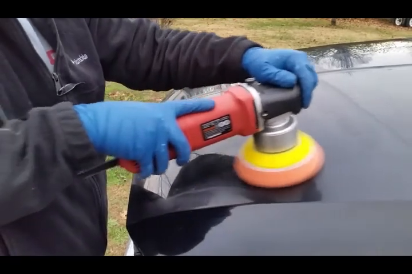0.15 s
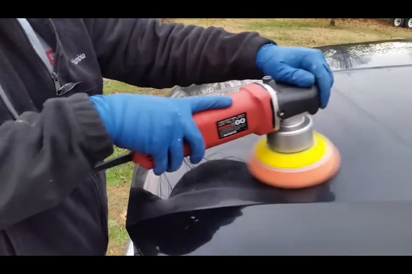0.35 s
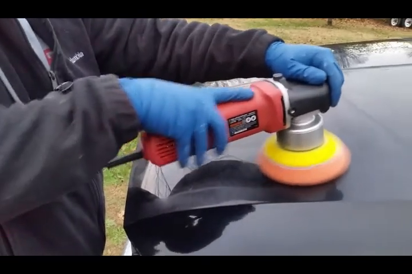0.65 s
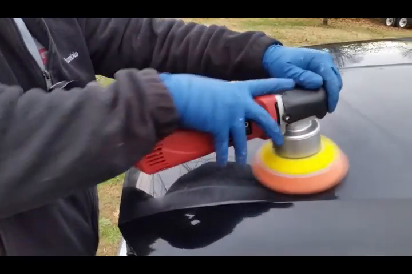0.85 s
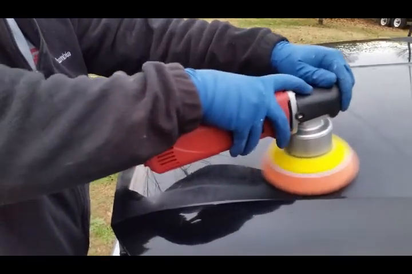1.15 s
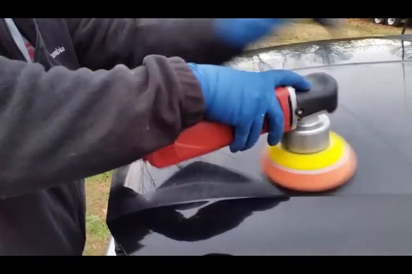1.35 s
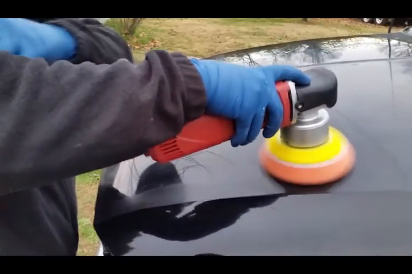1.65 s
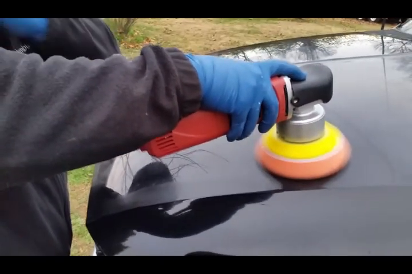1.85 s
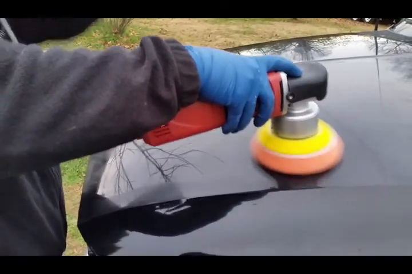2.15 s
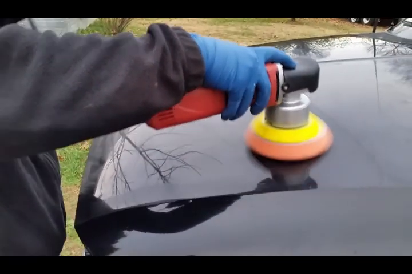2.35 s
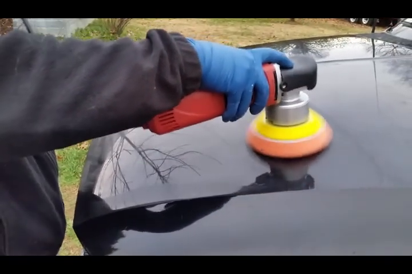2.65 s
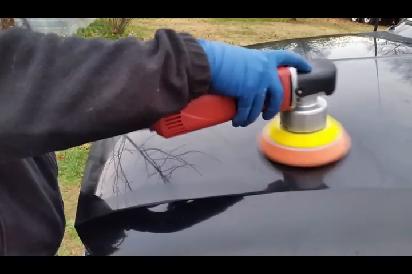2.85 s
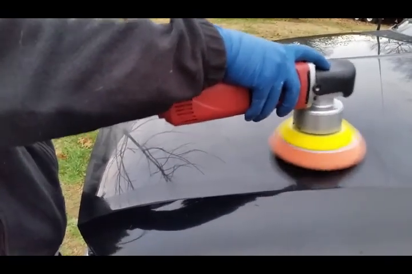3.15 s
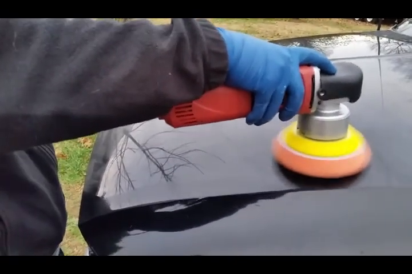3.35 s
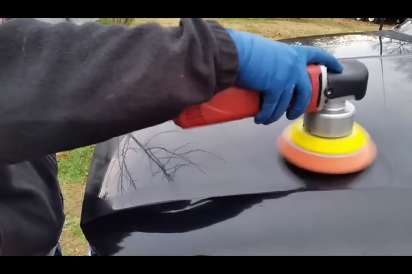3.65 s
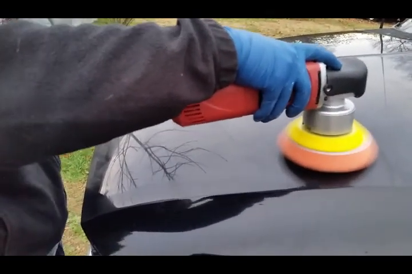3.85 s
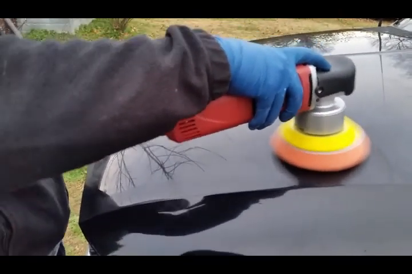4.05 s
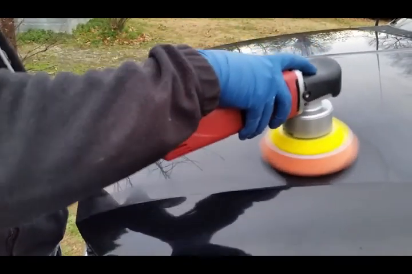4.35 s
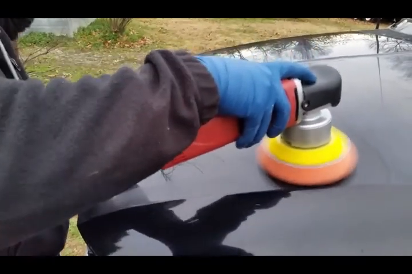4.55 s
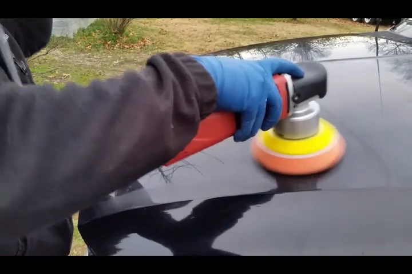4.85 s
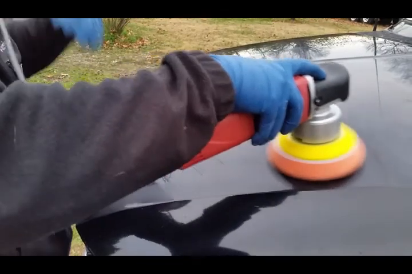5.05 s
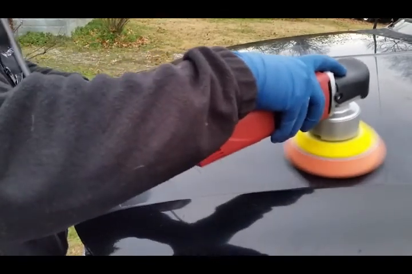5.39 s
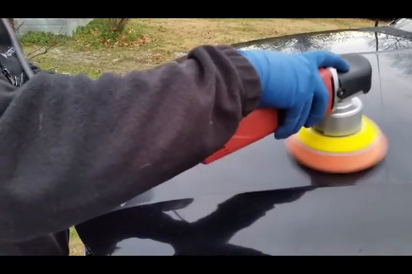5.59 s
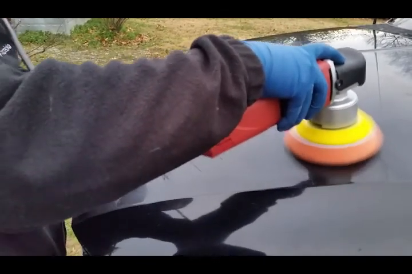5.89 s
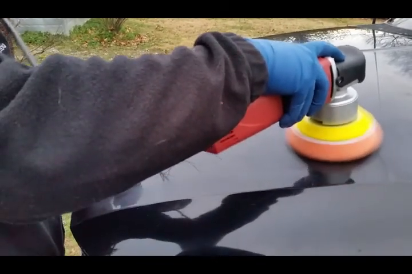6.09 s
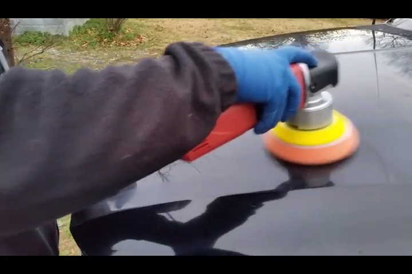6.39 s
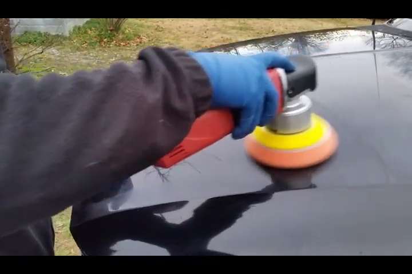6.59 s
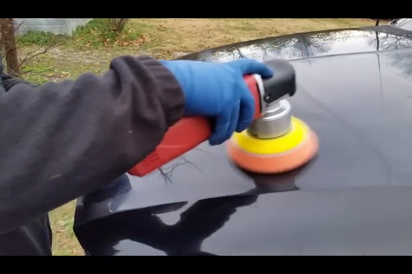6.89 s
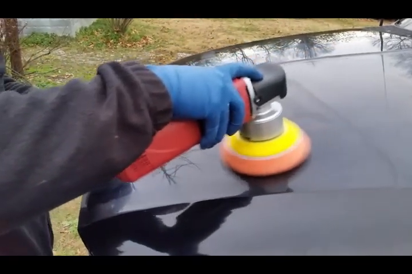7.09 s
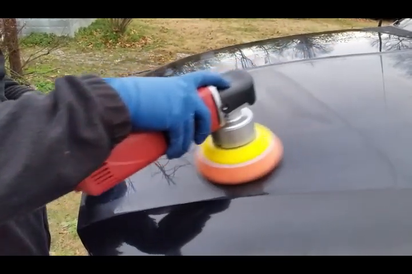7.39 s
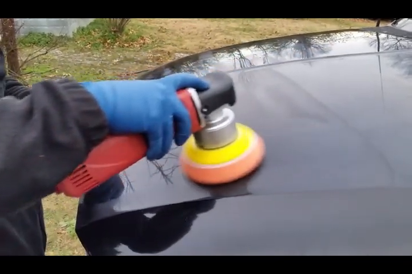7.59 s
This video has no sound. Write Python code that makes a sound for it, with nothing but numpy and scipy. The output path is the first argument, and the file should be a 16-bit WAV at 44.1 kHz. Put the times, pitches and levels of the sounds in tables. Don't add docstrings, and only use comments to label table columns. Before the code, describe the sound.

Continuous close polisher noise: a buzzing low hum through sheet metal, rough foam rub, gear clatter, airy fan hiss and a thin high whine.

```python
import sys
import numpy as np
from scipy import signal
from scipy.fft import rfft, irfft, next_fast_len
from scipy.io import wavfile
from scipy.ndimage import uniform_filter1d, map_coordinates

SR = 44100
rng = np.random.default_rng(int(sys.argv[2]) if len(sys.argv) > 2 else 0)


def voltage_ratio(level):
    return 10 ** (np.asarray(level, float) / 20)


def unload_audio(sound):
    columns = np.transpose(np.atleast_2d(sound))
    steps = np.round(np.clip(columns, -1, 1) * 32767)
    wavfile.write(sys.argv[1], SR, steps.astype(np.int16))


N = 340893
GEAR = 11 / 39


def unit(x):
    return x / np.sqrt(np.mean(np.mean(np.atleast_2d(x), 0) ** 2) + 1e-20)


def along(points, hz):
    f, v = np.transpose(points)
    return np.interp(np.log(hz + 1), np.log(f + 1), v)


def curves(rows):
    s, *cols = np.transpose(rows)
    return [np.interp(np.arange(N) / SR, s, c) for c in cols]


def swell(start_s, length_s, rise_s, fall_s):
    t = np.arange(N) / SR
    return np.clip(np.minimum((t - start_s) / rise_s, (start_s + length_s - t) / fall_s), 0, 1)


def slow(rate):
    knots = np.linspace(0, N * rate / SR, N // 64 + 2)
    return map_coordinates(rng.standard_normal(400), [knots], mode="wrap")


def full(coarse):
    return np.interp(np.arange(N) / 64, np.arange(len(coarse)), coarse)


def wobble(rate):
    return full(slow(rate))


def filtered(x, response):
    m = next_fast_len(N + 8192)
    return irfft(rfft(x, m) * response(np.fft.rfftfreq(m, 1 / SR)), m)[..., :N]


def patches(x, depth_db, bins, frames, tilt_db=0, turn=0):
    z = signal.stft(x, nperseg=512)[2]
    field = rng.standard_normal(z.shape)
    for _ in range(2):
        field = uniform_filter1d(field, size=bins, axis=1)
        field = uniform_filter1d(field, size=frames, axis=2)
    gain = voltage_ratio(depth_db * field / field.std() + tilt_db)
    return signal.istft(z * gain * np.exp(-1j * turn), nperseg=512)[1][:, :N]


# (frequency [Hz], likeness [0-1])
ALIKE = [(25, .7), (60, 1), (300, 0), (700, 0.94), (1200, 0), (2000, 0.27), (5000, 0.49), (6500, 0.1),
         (14000, 0)]


def rush(colour, lag_s):
    turn = lambda hz: np.arccos(np.clip(along(ALIKE, hz), 0, 1)) / 2
    share = lambda hz: np.array([np.cos(turn(hz)), np.sin(turn(hz))])
    mid, side = filtered(rng.standard_normal((2, N)), share)
    late = lambda hz: np.exp(-1j * np.pi * hz * lag_s * np.array([[1], [-1]]))
    return unit(filtered(np.array([mid + side, mid - side]), lambda hz: colour(hz) * late(hz)))


# (time [s], speed [turns/s])
SHAFT = [(0, 319.4), (.75, 321.7), (1.2, 321), (1.75, 326), (2, 327.2), (2.5, 327.2), (3, 328.5),
         (3.75, 328.9), (4.5, 333.5), (4.9, 334.9), (5.25, 332.2), (5.75, 328.7), (6.25, 323.9),
         (6.5, 323.4), (7.73, 323)]


def armature():
    speed, = curves(SHAFT)
    return speed, 2 * np.pi * np.cumsum(speed) / SR


# (time [s], turns made [turns])
PAD = [(0, .33), (.6, 5.2), (1.35, 11.9), (2.7, 27.26), (4.5, 46.97), (5.1, 54.57), (5.7, 60.71),
       (6.6, 68.9), (7.73, 78.45)]


def pad_spin():
    return 2 * np.pi * curves(PAD)[0]


# (time [s], delay of the left port [ms])
LAG = [(0, .085), (1.5, .155), (2.5, .11), (3.8, .19), (4.7, .16), (6.2, .19), (6.8, .11), (7.2, .08),
       (7.73, .02)]


def port_lag():
    return curves(LAG)[0]


# (time [s], orbit push [dB], slap [dB], tilt [0-1])
CONTACT = [(0, -26, -36.5, 0.5), (.36, -24.5, -30.5, 0.05), (.84, -25, -25.5, 0.2),
           (1.38, -21, -21.5, 0.08), (1.95, -20, -19, 0.12), (2.2, -20.5, -17.5, 0.12),
           (2.56, -21.3, -14, 0.03), (2.84, -22, -23, 0.07), (3.2, -19.5, -14, 0.02),
           (3.5, -19.5, -14, 0.04), (3.98, -20, -14.5, 0), (4.3, -18.5, -21.5, 0.46),
           (5.04, -19, -23.5, 0.53), (5.7, -19.5, -18.5, 0.8), (6.0, -21.5, -22, 1),
           (6.76, -19, -22.5, 0.9), (7.19, -19.5, -20.5, 0.17), (7.73, -23.5, -32, 1)]
# (start [s], length [s], 3rd overtone gain [dB], 4th overtone gain [dB])
BOOMS = [
    (0.696, 0.55, -0.5, -7),
    (1.4, 0.81, -5.5, -0.5),
    (2.275, 0.79, 7, -1.5),
    (2.3, 0.4, -0.5, 4.5),
    (3.2, 1.13, 3.5, 2),
    (5.092, 0.51, 4, 2.5),
    (5.648, 0.8, 10.5, 6),
    (6.99, .45, 5.5, 2.5),
]


def drumming():
    push_db, slap_db, tilt = curves(CONTACT)
    boom3_db, boom4_db = sum(np.outer(gains, swell(s, long, rise_s=0.18, fall_s=0.03))
                             for s, long, *gains in BOOMS)
    third_db = -32 + 0.28 * (slap_db + 21) + boom3_db
    rest_db = -41
    fourth_db = np.maximum(-36.5 + 1.06 * (slap_db + 22) + boom4_db, rest_db)
    shares = [tilt, 0.5 - 0.036 * boom3_db, 0.7 - 0.037 * (fourth_db - rest_db)]
    return push_db, [slap_db, third_db, fourth_db], np.clip(shares, 0, 1)


def overtone(angle, spin, share):
    sides, spin = 0, np.pad(spin[::64], (0, 1), "edge") + 1.3 * slow(.8)
    for step, db in [(1, 0), (-1, 0), (2, -7), (-2, -5), (3, -13), (-3, -10)]:  # (pad turns, dB)
        phase = step * spin + 1.7 * slow(2) + step
        sides = sides + voltage_ratio(db + 3.5 * slow(3)) * np.exp(1j * phase)
    sides = full(sides / np.sqrt(uniform_filter1d(np.abs(sides) ** 2, size=SR // 192)))
    tone = np.sqrt(1 - share) + np.sqrt(share) * sides
    return np.sqrt(2) * np.real(tone * np.exp(1j * (angle + 0.72 * wobble(1.337))))


# (multiple of the orbit rate, level relative to the blow [dB])
UPPER = [
    (5, -4.5),
    (6, -18),
    (7, -22),
    (8, -18),
    (9, -23),
]
# (frequency [Hz], density [dB per Hz])
RUMBLE = [(18, -21), (26, -16), (45, -8.5), (62, -1), (125, -3), (170, -14.5), (260, 4), (350, -2.5),
          (480, -6), (620, -48), (800, -24.5)]
# (frequency [Hz], density [dB per Hz])
THWACK = [(200, -60), (330, -4), (560, 0), (720, -6), (1000, -14), (1500, -50)]
# (frequency [Hz], left over right [dB])
PANEL_LEAN = [(60, 3), (92, 3.5), (185, 5.5), (280, 8), (370, 9), (560, 6)]


def panel(shaft):
    orbit, spin = GEAR * shaft, pad_spin()
    push_db, (slap_db, third_db, fourth_db), shares = drumming()
    tilt = shares[0]
    push_db = push_db + 0.47 * np.cos(spin) + 0.45 * wobble(21)
    hum = voltage_ratio(push_db) * np.sqrt(2) * np.sin(orbit)

    rocking_db = 0.51 * np.clip(third_db + 29.5, 0, 8) * tilt * np.cos(spin - 1.1)
    low_levels = [slap_db, third_db + rocking_db, fourth_db + rocking_db]
    for k, (db, share) in enumerate(zip(low_levels, shares), start=2):
        hum = hum + voltage_ratio(db - .4) * overtone(k * orbit, spin, .62 * share)

    chatter_db = np.clip(third_db + 28, 0, 8) * np.clip(2 * tilt, 0, 1) * np.cos(spin)
    blow = voltage_ratio(1.535 * fourth_db + 10.5) + tilt * voltage_ratio(1.39 * third_db - 4 + chatter_db)
    for k, under_db in UPPER:
        level = blow * voltage_ratio(under_db + 3.2 * wobble(2.465))
        hum = hum + level * overtone(round(k) * orbit, spin, 0.71 * shares[2])

    shake_db = -35.0 + 0.24 * (third_db + 27) + np.cos(spin) + 0.52 * chatter_db
    rumble = rush(lambda hz: voltage_ratio(along(RUMBLE, hz)), lag_s=1.1e-4)
    noise = voltage_ratio(shake_db) * patches(rumble, depth_db=1.2, bins=2, frames=20)
    thwack_db = -53.5 + 1.5 * np.clip(third_db + 33.5, 0, 8) * tilt + 1.4 * chatter_db
    noise = noise + voltage_ratio(thwack_db) * rush(lambda hz: voltage_ratio(along(THWACK, hz)), lag_s=1e-4)

    sign = np.array([[1], [-1]])
    lean = lambda hz: voltage_ratio(along(PANEL_LEAN, hz) / 2 * sign)
    even = lambda hz: lean(hz) / lean(hz).mean(0) * np.exp(-1j * np.pi * hz * 5e-5 * sign)
    return filtered(hum + noise, even)


# (frequency [Hz], density [dB per Hz])
LEFT = [(560, -10), (800, -1), (1400, -6.5), (2000, -5.5), (2400, -3), (4000, -2.5), (5400, -2.5),
        (6300, -7.5), (7300, -36.5), (8800, -15), (9900, -9.5), (10800, -4), (12700, 2.5), (14450, -3)]
# (frequency [Hz], density [dB per Hz])
RIGHT = [(560, -7.5), (800, -9), (1400, -11.5), (2000, -3), (2400, -5.5), (4000, -1.5), (5400, -2),
         (6300, -5.5), (7300, -17.5), (8800, -3.5), (9900, -11.5), (10800, -7), (12700, -19.5),
         (14450, -6.5)]
NOTCH_DB = [
    [-16],
    [-15],
]
# (low edge [Hz], high edge [Hz])
BANDS = [
    (480, 1500),
    (1500, 7300),
    (7300, 11800),
    (11800, 14560),
]
# (level [dB], growth [dB per dB of openness], creep [dB/s])
RUSH_LAW = [
    (-37.5, 0.52, 0.43),
    (-32, 0.62, .3),
    (-32, 0.82, 0.49),
    (-28, 0.7, 0.26),
]
# (time [s], level [dB])
OPEN = [(0.0, -25), (0.06, -27.5), (0.92, -25.5), (1.14, -22), (2.2, -25.5), (2.56, -31.5), (2.75, -28),
        (3.25, -29.5), (4.03, -27.5), (4.2, -24.5), (5.83, -23.5), (6.0, -27), (7.0, -26), (7.36, -23.5),
        (7.38, -27.5), (7.73, -28)]


def motor_noise(shaft):
    t, open_db = np.arange(N) / SR, curves(OPEN)[0]
    ports = lambda hz: voltage_ratio(np.maximum([along(LEFT, hz), along(RIGHT, hz)], NOTCH_DB))
    mains = 2 * np.pi * 120.6 * t
    beat = 1 + .07 * np.cos(shaft) + .07 * np.cos(2 * shaft + 1)
    beat = beat + .06 * np.cos(GEAR * shaft) + .05 * np.cos(mains)
    total, shared = 0, wobble(9) + .9 * np.cos(pad_spin())
    for (db, grows, creep), (lo, hi) in zip(RUSH_LAW, BANDS):
        db = db + grows * (open_db - open_db.mean()) + creep * (t - t.mean())
        edges = lambda hz: 1 / np.sqrt((1 + (lo / (hz + 1)) ** 16) * (1 + (hz / hi) ** 16))
        band = rush(lambda hz: ports(hz) * edges(hz), lag_s=0)
        total = total + voltage_ratio(db - .5 + .55 * shared + .6 * wobble(9)) * band

    lag_ms = np.pad(port_lag(), (0, 512), "edge")[::256][:-(-N // 256) + 1]
    hz, left_only = np.fft.rfftfreq(512, 1 / SR)[:, None], np.array([1, 0])[:, None, None]
    turn = 2 * np.pi * hz * lag_ms / 1000 * left_only
    centre_hz = 12340 + 6360 * lag_ms
    slope = np.clip(hz - 12800, -1500, 1500) * (np.arange(257)[:, None] > 125)
    tilt_db = 4.5e-6 * slope * (centre_hz - 12900) * left_only
    total = patches(beat * total, depth_db=1.6, bins=3, frames=120, tilt_db=tilt_db, turn=turn)
    return patches(total, depth_db=0.6, bins=8, frames=14)


# (shaft order, left level [dB], right level [dB])
ORDER = [(2, -50, -49), (4.8, -57, -57), (6.2, -52, -51), (9, -57, -52), (10, -54, -54), (10.72, -49, -52),
         (11, -45, -51), (11.62, -54, -49), (12, -47, -41), (13, -45, -39), (16, -51, -52), (20, -54, -56),
         (21, -59, -62), (22, -66, -61), (23, -62, -64), (24, -56, -57), (25, -57, -53), (26, -50, -45),
         (27, -54, -42), (28, -57, -44), (29, -56, -48), (32, -46, -52), (33, -41, -47), (34, -43, -48),
         (36, -41, -58), (37, -39, -56), (38, -38, -59), (39, -34, -57), (40, -38, -55), (41, -38, -57)]
RESTING = [
    -57,
    -59.5,
    -45.5,
    -61,
    -47,
]
# (start [s], length [s], gain [dB])
FLARES = [
    [(7.15, 1, 13.5)],
    [(-.4, 2.3, 17.5), (.7, 2.4, 5.5), (5.3, 2.9, 21)],
    [(.7, 7.5, 4.5), (6.5, 1.1, 6.5)],
    [(-.4, 3.7, 11), (4.3, 1.1, 14), (6.45, 1.8, 15)],
    [(-.4, 3.7, 7), (4.9, 3.2, 7.5), (5.6, 4.1, 5)],
]


def whine(speed, shaft):
    total = np.zeros((2, N))
    flutter = .045 * wobble(30) + .1 * wobble(5)
    behind = 2 * np.pi * speed * port_lag() * np.array([[1e-3], [0]])
    ramp_s = 0.47
    tone, mesh, slot, left_blade, right_blade = [
        db + sum(gain * swell(s, long, ramp_s, ramp_s) for s, long, gain in rows)
        for db, rows in zip(RESTING, FLARES)]
    strong = {2: [slot * 0 - 52] * 2, 6.2: [tone, tone], 11: [mesh, mesh / 2 - 29],
              12: [slot / 2 - 28, slot], 13: [left_blade, right_blade]}
    for k, left_db, right_db in ORDER:
        fades = np.array([wobble(1.1), wobble(1.75)])
        if k in strong:
            db = np.array(strong[k]) + .7 + fades + 1.2 * wobble(7)
        else:
            db = np.array([[left_db], [right_db]]) - 1.5 + 3.8 * fades + 2.0 * wobble(11)
        angle = k * (shaft + flutter - behind) + rng.uniform(0, 2 * np.pi)
        total += voltage_ratio(db) * np.sqrt(2) * np.sin(angle)
    return total


def housing():
    mode_hz, width_hz = 4624, 14
    response = lambda f: 1j * f * width_hz / (mode_hz ** 2 - f * f + 1j * f * width_hz)
    return voltage_ratio([[-60], [-48]]) * unit(filtered(rng.standard_normal(N), response))


def scene():
    speed, shaft = armature()
    return panel(shaft) + motor_noise(shaft) + whine(speed, shaft) + housing()


def thinned(z, hz, floor, loud_db):
    power = uniform_filter1d(uniform_filter1d(np.abs(z) ** 2, size=6, axis=1), size=2, axis=2)
    unsteady = uniform_filter1d(rng.standard_normal(z.shape), size=8, axis=1)
    unsteady_db = 11 * uniform_filter1d(unsteady, size=2, axis=2)
    floor_db = along(floor, hz)[:, None] + 11.8 + loud_db + unsteady_db
    return z * (power > voltage_ratio(floor_db) ** 2)


def low_pass(x):
    return signal.sosfilt(signal.butter(12, 15270, fs=SR, output="sos"), x)


# (frequency [Hz], density [dB per Hz])
DROP_LR = [(1800, -84), (2500, -74), (3200, -75), (3800, -79), (4400, -73), (5600, -79), (6300, -76),
           (6700, -71.5), (8000, -72), (9300, -73), (10200, -79), (12700, -76.5), (14000, -85)]
# (frequency [Hz], density [dB per Hz])
DROP_MS = [(1500, -86), (2000, -74.5), (3200, -72), (3700, -79), (4300, -80), (4800, -71.5), (5600, -73),
           (6400, -78)]


def record(dry):
    top_hz = 14530
    edge = lambda hz: np.clip((top_hz + 90 - hz) / 150, 0, 1) ** 2
    hz, _, z = signal.stft(filtered(dry, edge), SR, nperseg=2048)
    power = lambda part: uniform_filter1d(np.sum(np.abs(part) ** 2, axis=(0, 1)), size=5)
    level = lambda part: 10 * np.log10(power(part) + 1e-9)
    treble_db = level(z[:, hz > 1500])
    loud_db = .2 * (level(z) + 13) + .8 * (treble_db - np.mean(treble_db))
    left, right = thinned(z, hz, [(20, -200)] + DROP_LR + [(15000, -200)], loud_db)
    mid_side = np.array([left + right, left - right]) / 2
    mid, side = thinned(mid_side, hz, [(20, -200)] + DROP_MS + [(7000, -200)], loud_db)
    kept = signal.istft(np.array([mid + side, mid - side]), nperseg=2048)[1][:, :N]
    return low_pass(kept)


dry = scene()
out = record(dry)
unload_audio(out)
```